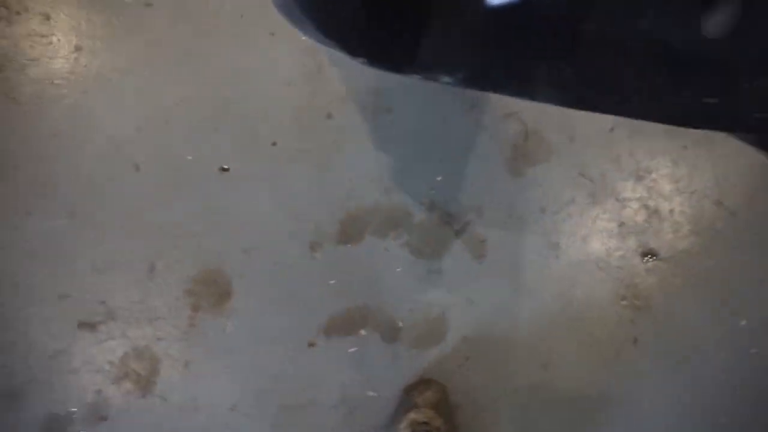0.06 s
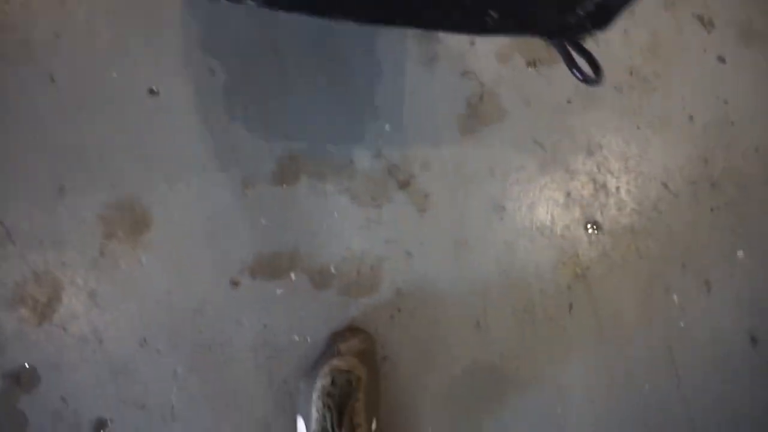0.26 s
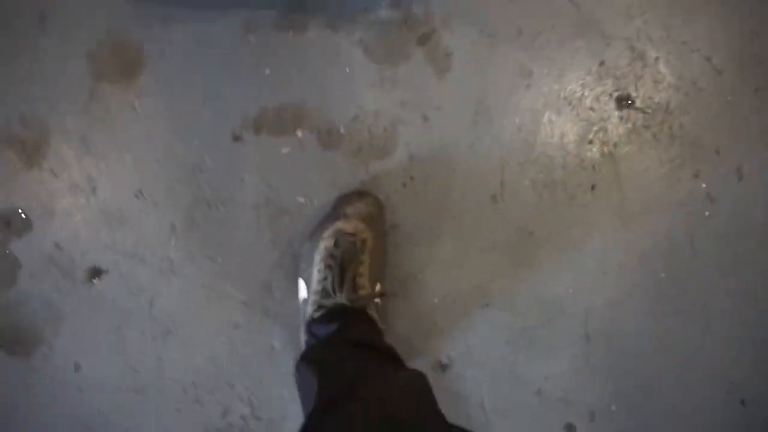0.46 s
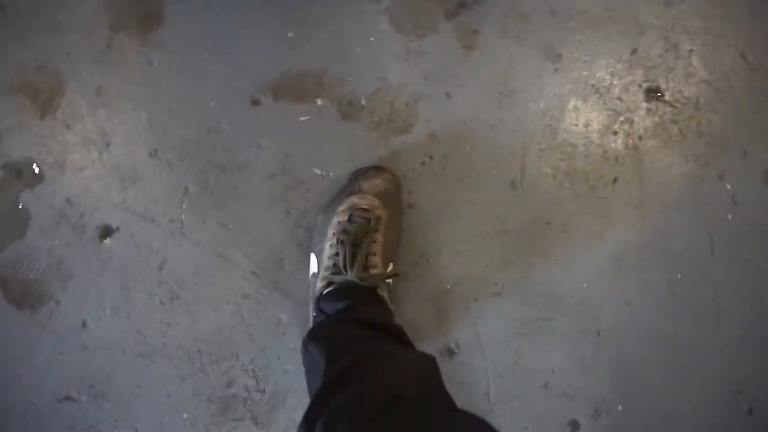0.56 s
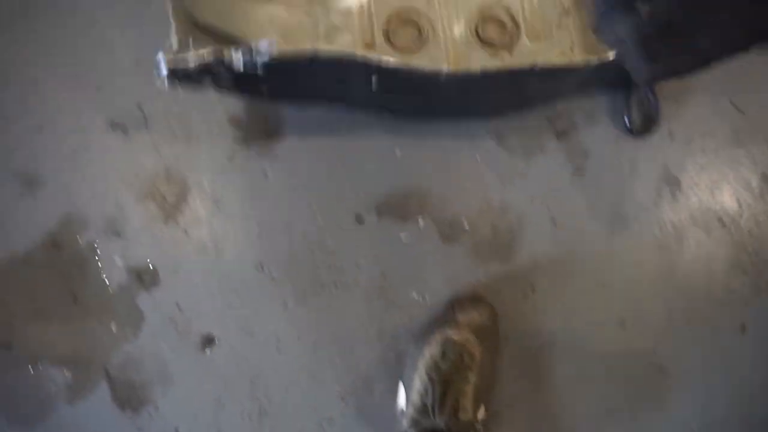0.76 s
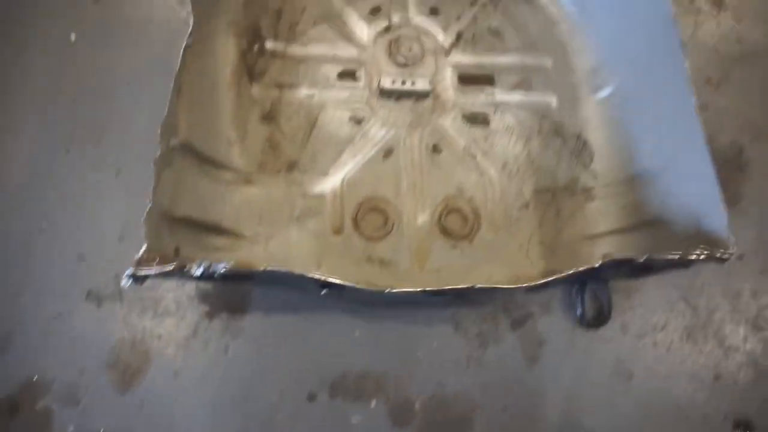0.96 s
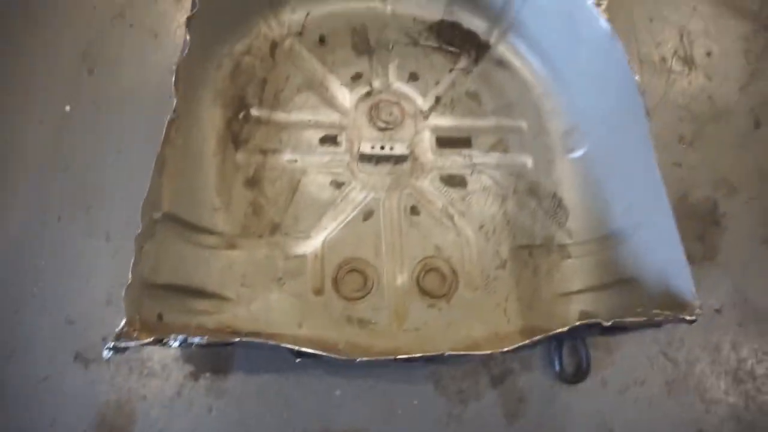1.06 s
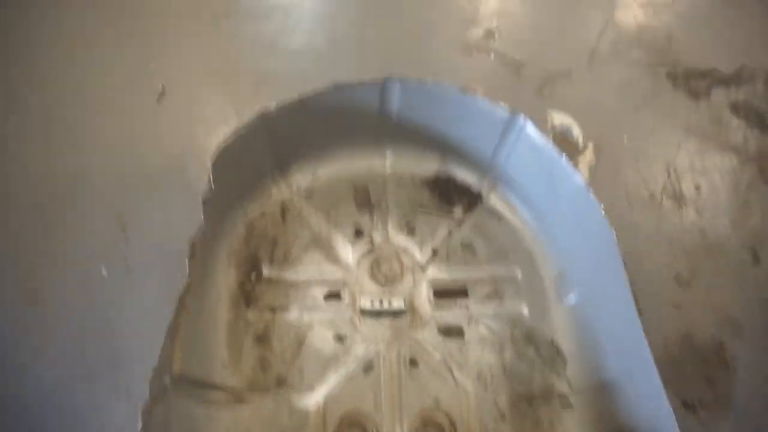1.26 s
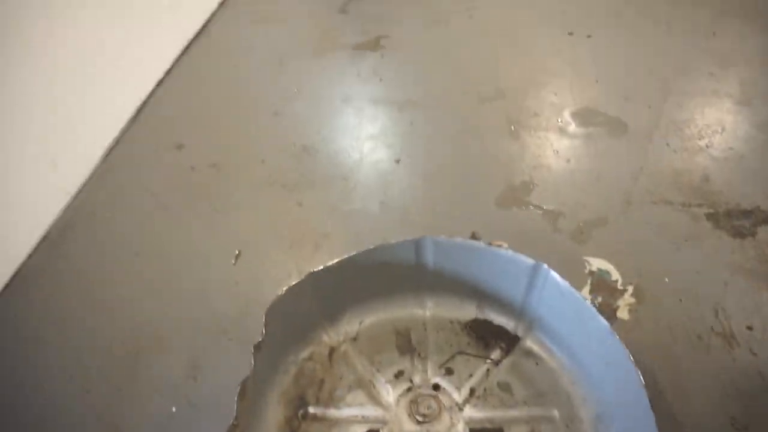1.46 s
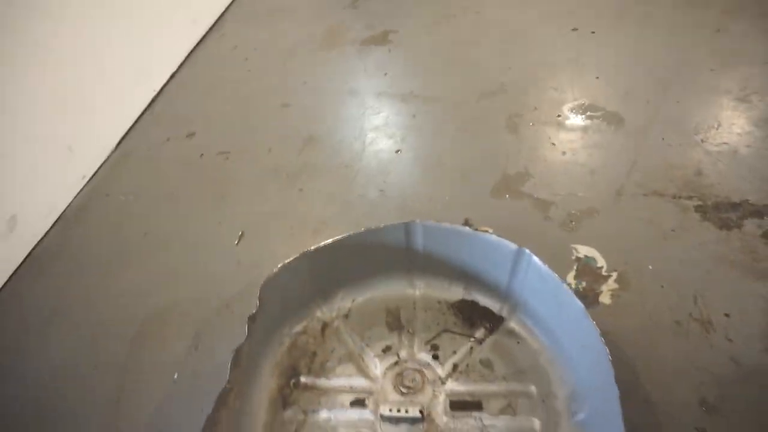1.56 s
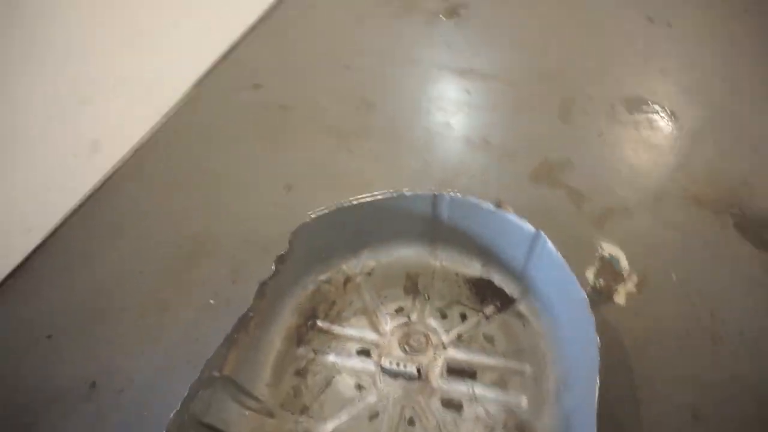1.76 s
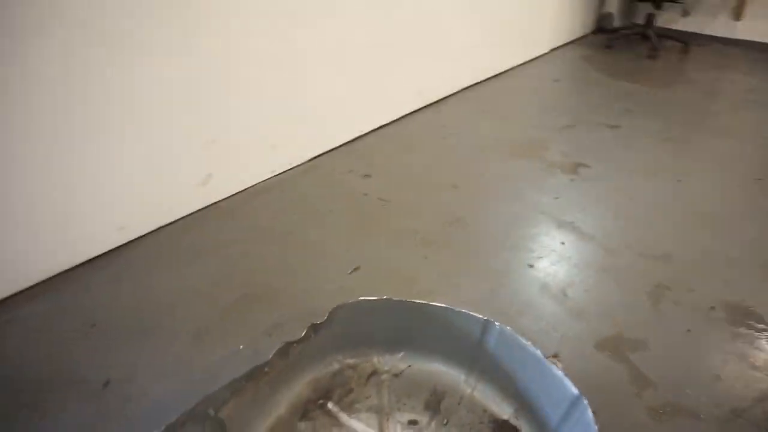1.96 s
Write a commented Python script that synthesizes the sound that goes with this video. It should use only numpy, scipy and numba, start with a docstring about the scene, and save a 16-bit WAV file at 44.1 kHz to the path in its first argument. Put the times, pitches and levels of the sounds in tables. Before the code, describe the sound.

A steel panel drops onto concrete with a loud crash, clattering briefly in a garage.

```python
"""Steel panel dropped in a garage

A cut-out steel sheet slips from the grip with a soft rub and lands on concrete with a boom.
It rocks and clatters for a second, then rings out. Its cut edges clink and drag over grit,
and air puffs out from under it. The room echoes, and a limiter turns down the hardest hits."""
import sys
import numpy as np
from scipy import signal
from scipy.fft import rfft, irfft, next_fast_len
from scipy.io import wavfile
from scipy.ndimage import uniform_filter1d
from numba import njit

SR = 44100
rng = np.random.default_rng(int(sys.argv[2]) if len(sys.argv) > 2 else 0)


def pcm_store(signal):
    """Save signal as 16-bit PCM."""
    levels = np.round(np.clip(np.atleast_2d(signal), -1, 1) * 32767)
    wavfile.write(sys.argv[1], SR, levels.astype(np.int16).T)


N = 88949
T = np.arange(N) / SR
BANDS_HZ = np.geomspace(31.25, 16000, 19)

# Levels are relative. A mode is one ringing tone; t60 is the time it takes to fade by 60 dB.
# the panel hits the floor: t/s, level/dB, extra bass/dB, extra treble/dB, extra ring/dB
FLOOR_HITS = [(0.401, -36.5, -3, 0.5, -0.5), (0.443, -13, 10.5, -6, 1.5), (0.479, -23, 12.5, -7, 12),
              (0.505, -13.5, 15.5, -9, 4), (0.540, -18, 11.5, -0.5, 5.5), (0.595, -19, 11.5, -2.5, 1),
              (0.622, -16.5, 0.5, 0, 0), (0.678, -17.5, -3.5, 6, 0.5), (0.687, -20, -4, 7, -1),
              (0.696, -12.5, -8.5, -2.5, 0.5), (0.709, -21.5, -2, 6, -1.5), (0.722, -13.5, -11.5, 5, -5.5),
              (0.745, -8, -3, 2, -1.5), (0.764, -10.5, -7, -7.5, -1), (0.778, -14, 1.5, -2, 1),
              (0.800, -17.5, 6.5, -10.5, 3.5), (0.831, -10.5, -5, 0, 0), (0.848, -13, 0.5, -3, -1.5),
              (0.861, -10, -6.5, -10.5, -7), (0.869, -18, -7, -0.5, -1.5), (0.880, -11, -3.5, -10.5, -1.5),
              (0.903, -20, 0, -3.5, 5.5), (0.948, -26.5, 1, 8, -3), (0.964, -14.5, 0.5, 4, -2),
              (0.988, -18.5, 3.5, -7.5, 4.5), (1.012, -19, -4, -17.5, 1.5), (1.035, -18.5, 5, 7, 0),
              (1.060, -17.5, 2, -13.5, -1.5), (1.082, -26.5, -0.5, 8, 3.5), (1.111, -22.5, -10.5, 5, 2.5),
              (1.143, -20.5, -1.5, 5.5, 1), (1.186, -19, 0, 5, 1), (1.210, -22.5, 1.5, 6, 0),
              (1.222, -26, 2.5, 1.5, 1.5), (1.240, -23, -7, 5.5, -1), (1.278, -21, -1.5, -0.5, 1),
              (1.313, -27, 2, 1.5, -5.5), (1.326, -27.5, 0, 4, -4.5), (1.352, -27.5, 0, -1, -2.5),
              (1.390, -32, -6, 0, 3), (1.470, -38.5, 3.5, -0.5, -0.5), (1.905, -66.5, -9.5, 9, -8)]
# the panel's strongest modes: f/Hz, level/dB, t60/s, change once it has tipped over/dB
PANEL_MODES = [(116.6, -18, .25, -5), (190.3, -22.5, 0.33, 4), (234.94, -10.5, 0.4, 0),
               (260.6, -12.5, 0.26, 0.5), (287, -17.5, 0.67, 4), (363, -21, 0.2, 2.5), (438.8, -7, .36, 1),
               (519.5, -8, .36, -2), (605.2, -9.5, .5, 1), (674, -9.5, 0.21, -6.5), (701, -15, 0.56, 9.5),
               (743, -11.5, 0.37, -3.5), (797.4, -11.5, 0.37, -4), (994, -14, 0.39, -1),
               (1158, -22, 0.41, -6.5), (1228, -21, 0.3, -4.5), (1422, -22, 0.36, 4),
               (1562, -24.5, .45, 7.5), (1717, -20.5, 0.44, 7), (1780, -22.5, .5, 8), (1820, -27, 0.45, 7),
               (1927, -27.5, .55, 3.5), (1954, -22, .45, 4), (1997, -26.5, 0.55, 8), (2165, -20.5, 0.27, 4),
               (2436, -22, 0.37, -6.5), (2785, -24.5, 0.37, 4), (2850, -22.5, 0.21, -1),
               (3536, -23.5, 0.22, -6.5)]
# tone colour of its many weaker modes: f/Hz, level/dB
PANEL_COLOUR = [(25, -37.5), (70, -29.5), (150, -17), (225, -4), (350, 2), (650, 4.5), (1150, -3),
                (1850, -1.5), (2400, -5.5), (2900, -6), (3400, -15.5), (4500, -17), (8000, -26),
                (16000, -33.5)]
# how long those weaker modes ring: f/Hz, t60/s
PANEL_DECAY = [(60, 0.64), (250, 0.68), (1000, 0.22), (3000, 0.12), (12000, 0.053)]
# a cut edge hits the floor: t/s, level/dB, treble tilt/(dB per octave), ring/dB, crack t60/s
EDGE_HITS = [(0.3049, -40, -4, -8.5, 0.073), (0.401, -27.5, 4, -25.5, .007), (0.4873, -16, 1.5, -22, 0.03),
             (0.493, -22, -6, -9.5, 0.0092), (0.5419, -17, -0.5, 0, 0.065), (0.564, -4, 4, -23, 0.026),
             (0.5719, -6, 7, -13, 0.046), (0.624, -24, -3, -19.5, 0.042), (0.634, -11, 10.5, -10, 0.017),
             (0.677, -19.5, 0, -18.5, 0.016), (0.7083, -8.5, -7, -19.5, 0.02),
             (0.747, -13.5, -10, -17.5, 0.027), (0.845, -25, -3, -14, 0.016),
             (0.9202, -5, 6.5, -21.5, 0.029), (0.950, -23, 2, -14.5, 0.021), (0.964, -5.5, 2, -10, 0.025),
             (0.9951, -8.5, 7.5, -22, 0.021), (1.136, -31, 9, -6, 0.022), (1.1762, -41, -1.5, -10, .015),
             (1.2094, -24, 1.5, -16, 0.02), (1.22, -26, 1, -18.5, 0.015), (1.2492, -15, 0.5, -0.5, 0.023),
             (1.3133, -33, -4.5, -13.5, 0.07), (1.351, -38, -1, -13, 0.028)]
# thin ring of the edge: f/Hz, level/dB, t60/s
EDGE_MODES = [(3030, -25, 0.19), (4390, -28.5, .12), (5180, -28.5, .08), (5770, -29, .11),
              (6430, -29.5, 0.094), (7940, -26.5, 0.085), (8850, -25, 0.078), (9100, -31, 0.14),
              (10530, -22, 0.097), (11750, -29, 0.12), (12500, -31, .11), (12700, -26.5, 0.12),
              (14100, -20, .15), (14700, -24.5, .1), (15550, -23.5, .09)]
# tone colour of the edge on concrete: f/Hz, level/dB
EDGE_COLOUR = [(100, -38), (1500, -11.5), (3500, 6.5), (6000, 1.5), (9000, 1.5), (13000, -0.5),
               (16000, -6.5)]
# the edge drags over grit: t/s, length/s, level/dB
DRAGS = [(0.486, .062, -24.5), (0.545, 0.15, -30), (0.736, 0.093, -39), (0.895, .03, -38.5),
         (0.957, 0.06, -43.5)]
# air pushed out from under the sheet: t/s, level/dB
AIR_PUFFS = [(0.443, -55), (0.487, -50.5), (0.534, -49), (0.664, -37.5), (0.762, -52.5), (0.85, -50),
             (0.902, -56), (1.07, -60), (1.232, -65)]
# tone colour of a puff: f/Hz, level/dB
THUD_COLOUR = [(20, -8), (45, -4.5), (90, 0.5), (160, -20.5), (400, -48.5), (2000, -84)]
# loudness of the rub against the grip: t/s, level/dB
RUB_LEVELS = [(0, -49.5), (.06, -48), (.11, -52), (.22, -53), (.27, -48.5), (.32, -46), (0.388, -47.5),
              (0.442, -56)]
# tone colour of the rub: f/Hz, level/dB
RUB_COLOUR = [(30, -32), (100, -14), (220, 3.5), (400, -4), (650, 2.5), (1200, -5), (2000, -2.5),
              (4500, -12.5), (9000, -20.5), (16000, -19.5)]
# how long the garage echoes: f/Hz, t60/s
ECHO_DECAY = [(100, 1.1), (300, 0.81), (700, 1.01), (2000, 0.82), (4000, 0.71), (8000, 0.47), (15000, 0.48)]
# strength of the echo: f/Hz, level/dB
ECHO_COLOUR = [(60, -28.5), (160, -18), (300, -3), (450, -15.5), (700, -6), (1200, -4), (1800, -2.5),
               (2500, -3), (5000, -3.5), (14000, -15.5)]
# tone colour of the still air: f/Hz, level/dB
AIR_COLOUR = [(40, -30.5), (120, -15.5), (300, -8), (700, 2.5), (1200, -12), (2000, -12.5), (4000, -25),
              (10000, -25.5), (16000, -36.5)]
# stereo width, as side (left-right difference) minus mid (shared part): f/Hz, level/dB
STEREO_WIDTH = [(30, -14.5), (120, -29.5), (250, -22.5), (500, -12.5), (1000, -8.5), (2000, -6),
                (4000, -1.5), (12000, -0.5)]

PANEL_DB, MODES_DB, LOW_CUT_HZ = -2.5, -6.5, 146
BOUNCE_DB, MAX_BOUNCE_S = -4, .022
CRACK_DB, CRACK_T60_S, CRACK_PER_TREBLE = -5, 0.027, .6
RISE_S, RISE_CYCLES, EDGE_RISE_S = 0.0017, 0.44, 0.00036
SIZZLE_DB, SIZZLE_T60_S = -22.5, .22
TOPPLE_S = (0.85, 1.19)  # the panel tips from its rim onto its dished back
GRAINS_PER_S, ECHO_DELAY_S, AIR_DB = 3500, .012, -70.5
LIMIT_DB, RELEASE_S, DETECT_S, TREBLE_SENSE, TOP_HZ = -11.5, 0.043, 0.0015, 0.77, 15750


def panel_clatter():
    """Each hit cracks, rings the sheet and bounces once; flat landings boom, hard ones clank."""
    out, t = np.zeros((2, N)), T[:SR // 2]
    weak_modes = split_bands(noise(PANEL_COLOUR))
    rise = 1 - np.exp(-(t / (RISE_S + RISE_CYCLES / BANDS_HZ[:, None])) ** 2)  # bass builds up slower
    body = rise * fade(t, at(PANEL_DECAY, BANDS_HZ)[:, None])
    crack = rise * np.clip(BANDS_HZ / 2500, 0, 1)[:, None] * fade(t, CRACK_T60_S)
    for start, db, bass, treble, ring_db in FLOOR_HITS:
        colour = [(250, db + bass), (520, db), (800, db), (2200, db + treble)]
        gains = undb(at(colour, BANDS_HZ) + PANEL_DB)
        envelope = body + undb(CRACK_DB + CRACK_PER_TREBLE * treble) * crack
        add(out, burst(weak_modes, gains, envelope), start)
        bounce = burst(weak_modes, gains * undb(BOUNCE_DB), body)
        add(out, bounce, start + MAX_BOUNCE_S * rng.uniform(.3, 1))
        # each contact clamps the sheet a little differently, shifting its pitches
        ring = undb(MODES_DB + ring_db) * ring_modes(toppling_modes(start), colour, detune=.004)
        fade_in = 1 - fade(T[:ring.shape[1]], t60=0.0067)
        add(out, ring * fade_in, start)
    # a thin open sheet gives off little deep bass
    return signal.sosfilt(signal.butter(4, LOW_CUT_HZ, "high", fs=SR, output="sos"), out)


def toppling_modes(start):
    """The floor holds the rim at first; as the panel tips over, most upper modes ring louder."""
    hz, db, t60, change_db = np.array(PANEL_MODES).T
    tipped = np.interp(start, TOPPLE_S, (0, 1))
    return np.column_stack([hz, db + change_db * tipped, t60])


def ring_modes(modes, colour, detune):
    """Fading tones; each place of contact drives them with its own random signs and strengths."""
    hz, db, t60 = np.array(modes, float).T
    sign, strength, spread, shift = rng.standard_normal((len(hz), 4)).T
    t = T[:SR * 3 // 5]
    phase = 2 * np.pi * (hz * (1 + detune * shift))[:, None] * t
    tones = np.sin(phase) * fade(t, t60[:, None])
    mid = np.sign(sign) * undb(1.2 * strength)
    side = spread * undb(at(STEREO_WIDTH, hz))
    gains = np.array([mid + side, mid - side]) * np.sqrt(2) * undb(db + at(colour, hz))
    return gains @ tones


def burst(noise_bands, gains, envelope):
    """Many close modes struck at once sound like noise: a random slice, shaped band by band."""
    size = envelope.shape[1]
    i = rng.integers(N - size)
    return np.einsum("b,bn,bcn->cn", gains, envelope, noise_bands[:, :, i:i + size])


def edge_clinks():
    """The cut edge clinks on the concrete: a short bright crack, a sizzle and a thin ring."""
    out, t = np.zeros((2, N)), T[:SR // 3]
    weak_modes = split_bands(noise(EDGE_COLOUR))
    rise = 1 - np.exp(-t / EDGE_RISE_S)
    sizzle = undb(SIZZLE_DB) * fade(t, SIZZLE_T60_S)
    octaves = np.log2(np.maximum(BANDS_HZ, 2500) / 9000)
    for start, db, tilt, ring_db, t60 in EDGE_HITS:
        envelope = np.tile(rise * (fade(t, t60) + sizzle), (len(BANDS_HZ), 1))
        add(out, burst(weak_modes, undb(db + tilt * octaves), envelope), start)
        add(out, undb(db + ring_db) * ring_modes(EDGE_MODES, EDGE_COLOUR, detune=0), start)
    return out


def grit_scrapes():
    """The edge drags over grit, and many tiny catches blur into a scrape."""
    force = np.zeros(N)
    for start, length, db in DRAGS:
        position = 2 * (T - start) / length - 1  # -1 to 1 during the drag
        force += undb(db) * np.sqrt(np.clip(1 - position ** 2, 0, 1))
    catches = (rng.random(N) < GRAINS_PER_S / SR) * undb(1.8 * rng.exponential(size=N))
    grit = signal.fftconvolve(catches, fade(T[:SR // 50], t60=0.045))[:N] * noise(EDGE_COLOUR)
    return force * grit / grit.std()


def air_puffs():
    """The flopping sheet pushes air out in soft, low thuds."""
    out, swell = np.zeros((2, N)), np.hanning(int(.04 * SR))
    for start, db in AIR_PUFFS:
        add(out, undb(db) * swell * noise(THUD_COLOUR, size=SR // 2)[:, :len(swell)], start)
    return out


def grip_rub():
    """The panel rubs softly as it slides out of the grip; the sound ends at the landing."""
    times, db = np.array(RUB_LEVELS).T
    return noise(RUB_COLOUR) * undb(np.interp(T, times, db, right=-120))


def garage_echo(x):
    """Bare walls and floor throw back a smooth echo; the treble dies first."""
    t, t60 = T[:SR], at(ECHO_DECAY, BANDS_HZ)[:, None]
    equal_energy = np.sqrt(2 * np.log(1000) / (t60 * SR))  # a longer echo gains no energy
    envelope = fade(t, t60) * equal_energy * undb(at(ECHO_COLOUR, BANDS_HZ))[:, None]
    white = noise([(20, 0), (20000, 0)], size=SR)
    tail = (split_bands(white) * envelope[:, None]).sum(0)
    out = np.zeros((2, N))
    add(out, signal.fftconvolve(x, tail, axes=1)[:, :N], ECHO_DELAY_S)
    return out


def still_air():
    """The faint, steady hush of the room."""
    return undb(AIR_DB) * noise(AIR_COLOUR)


def undb(db):
    """Turns decibels into a volume factor."""
    return 10 ** (np.asarray(db) / 20)


def at(points, hz):
    """Looks up a value between (f/Hz, value) points, with octaves evenly spaced."""
    f, values = np.array(points, float).T
    return np.interp(np.log(np.maximum(hz, 1)), np.log(f), values)


def fade(t, t60):
    """Dies away by 60 dB every t60 seconds."""
    return np.exp(-np.log(1000) * t / t60)


def noise(colour, size=N):
    """Stereo noise of strength (rms) 1 in the given colour; the bass is alike on both sides."""
    n = next_fast_len(size)
    hz = np.arange(n // 2 + 1) * SR / n
    mid, side = rfft(rng.standard_normal((2, n)))
    side = side * undb(at(STEREO_WIDTH, hz))
    x = irfft(np.array([mid + side, mid - side]) * undb(at(colour, hz)), n)[:, :size]
    return x / x.std()


def split_bands(x):
    """Splits a sound into half-octave bands that add back up to it."""
    size = x.shape[-1]
    n = next_fast_len(size)
    hz, bands = np.arange(n // 2 + 1) * SR / n, np.arange(len(BANDS_HZ))
    place = np.interp(np.log(hz + 1), np.log(BANDS_HZ), bands)
    spectrum = rfft(x, n)
    return np.array([irfft(spectrum * np.maximum(1 - abs(place - k), 0), n)[:, :size] for k in bands])


def add(out, x, start):
    """Mixes x into out at a time in seconds."""
    i = max(int(start * SR), 0)
    out[:, i:i + x.shape[1]] += x[:, :max(N - i, 0)]


@njit
def follow_peaks(x, release):
    """Jumps to each peak and sinks back."""
    out, level = np.empty(len(x)), 0.
    for i in range(len(x)):
        level = max(x[i], level * release)
        out[i] = level
    return out


def scene():
    """Mixes the steel sounds, their echo and the quiet background."""
    steel = panel_clatter() + edge_clinks() + grit_scrapes()
    return steel + garage_echo(steel) + air_puffs() + grip_rub() + still_air()


def record(dry):
    """A fast limiter, keener on treble, turns down loud peaks; then the highest treble is cut."""
    power = (dry ** 2 + (TREBLE_SENSE * np.diff(dry, prepend=0)) ** 2).mean(0)
    window = int(DETECT_S * SR)
    level = np.sqrt(abs(uniform_filter1d(power, window)))
    peaks = follow_peaks(level, np.exp(-1 / (RELEASE_S * SR)))
    gain = uniform_filter1d(1 / np.maximum(peaks / undb(LIMIT_DB), 1), window)
    return signal.sosfilt(signal.ellip(10, .2, 80, TOP_HZ, fs=SR, output="sos"), dry * gain)


dry = scene()
out = record(dry)
pcm_store(out)
```